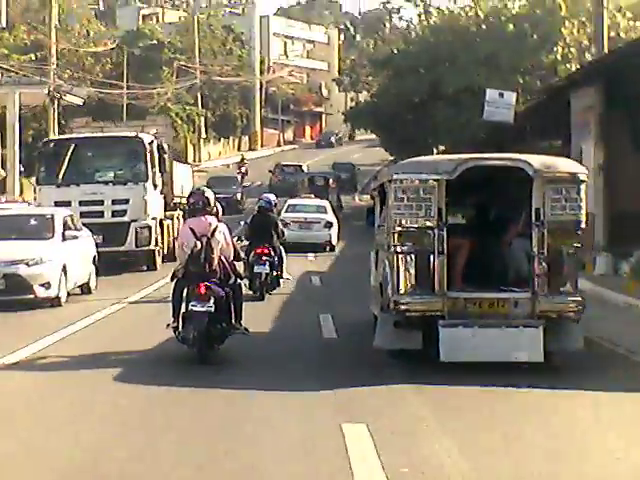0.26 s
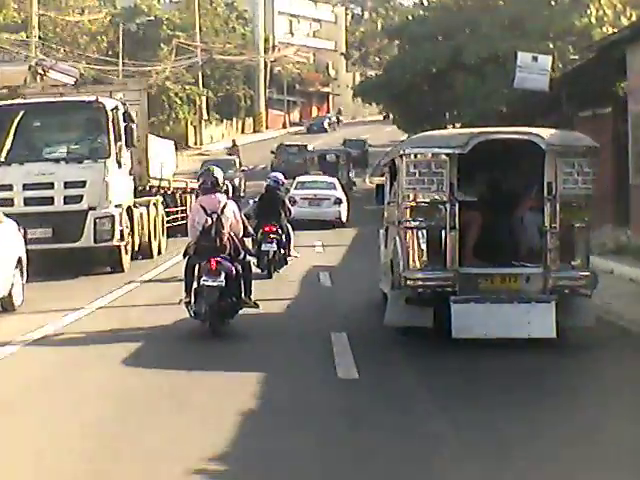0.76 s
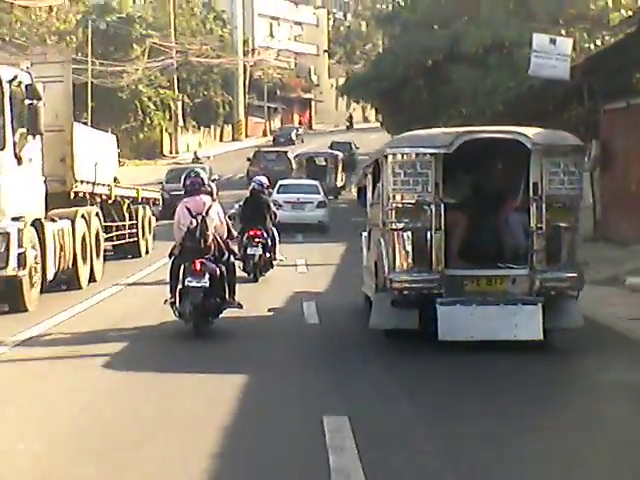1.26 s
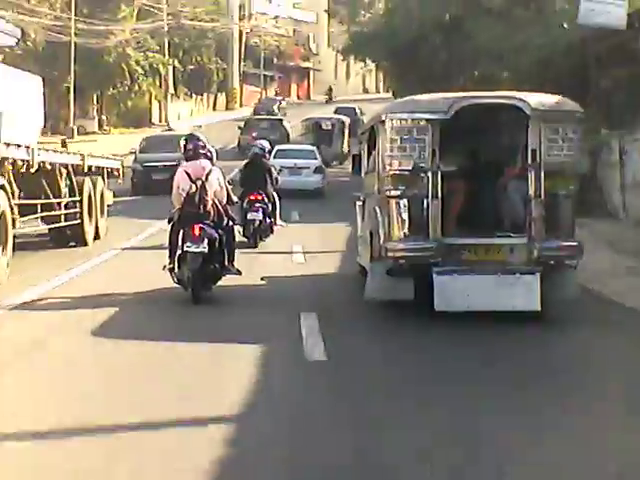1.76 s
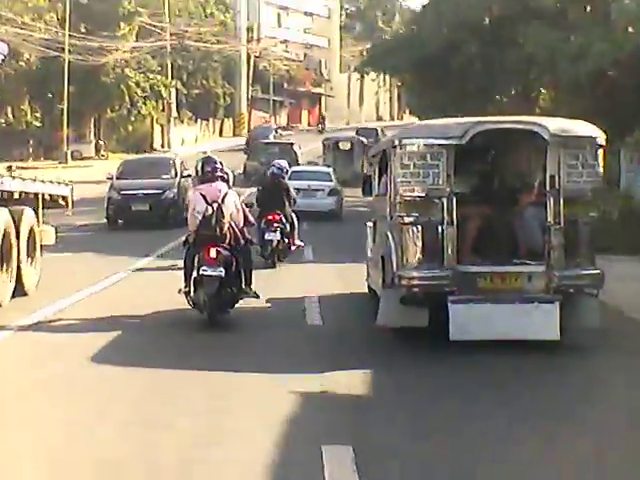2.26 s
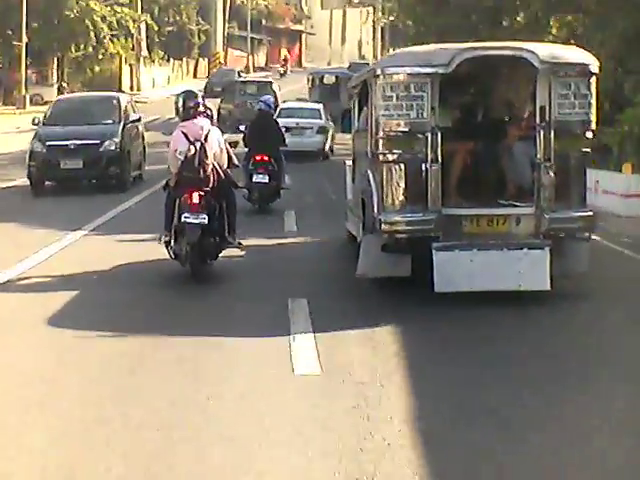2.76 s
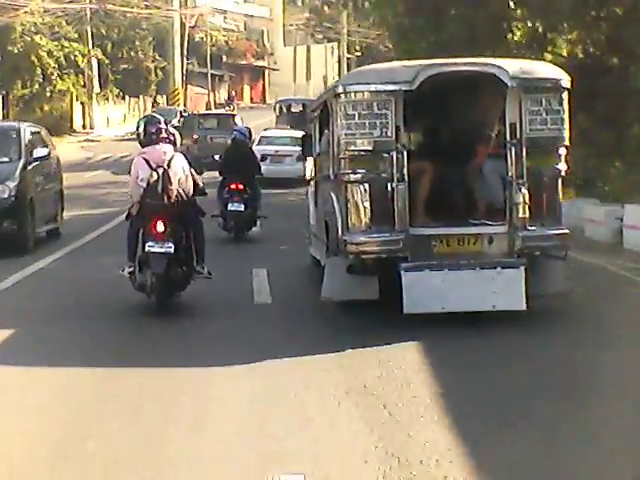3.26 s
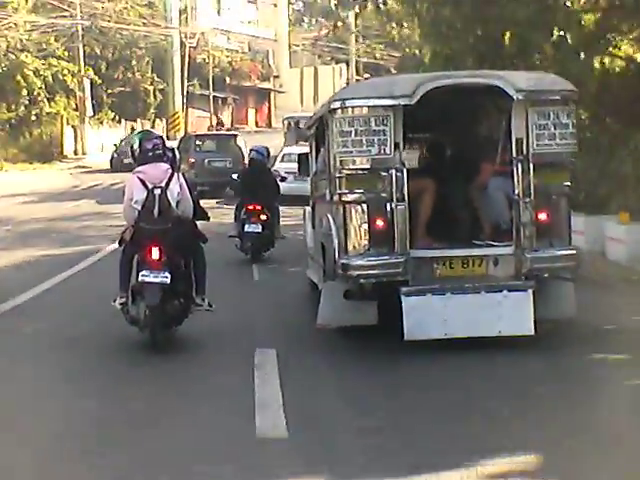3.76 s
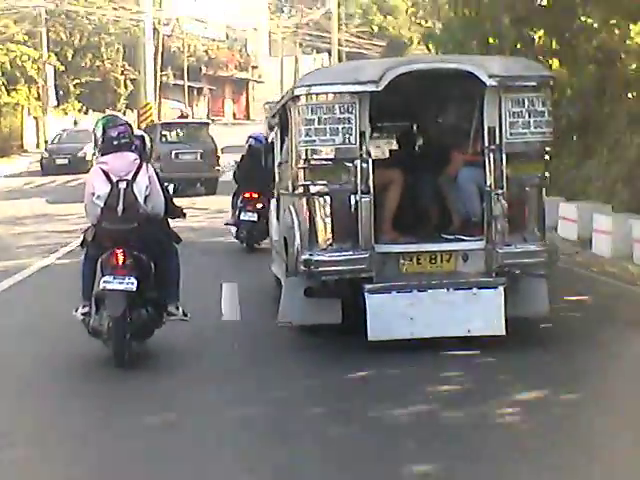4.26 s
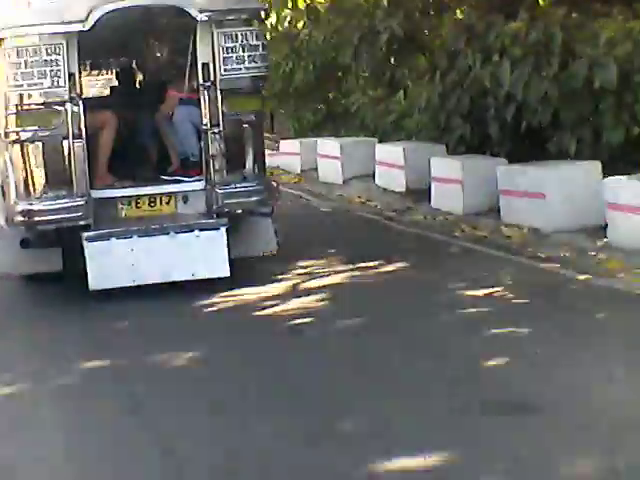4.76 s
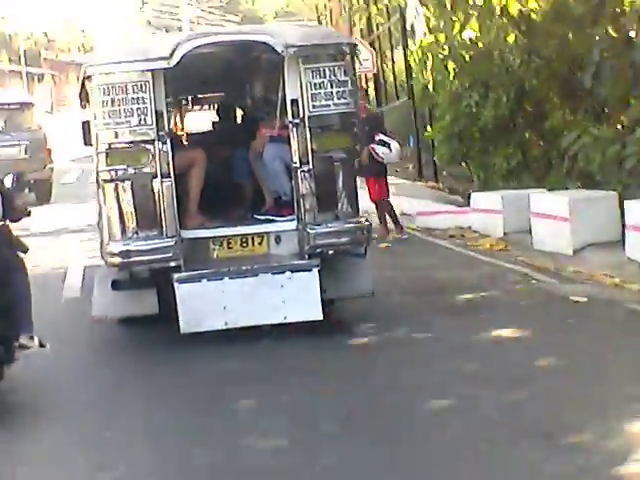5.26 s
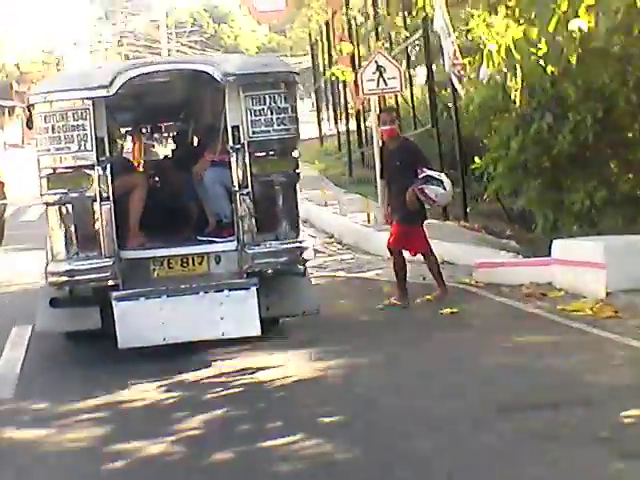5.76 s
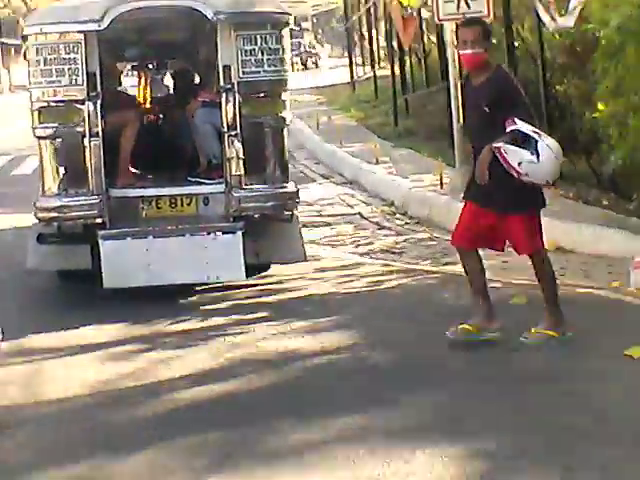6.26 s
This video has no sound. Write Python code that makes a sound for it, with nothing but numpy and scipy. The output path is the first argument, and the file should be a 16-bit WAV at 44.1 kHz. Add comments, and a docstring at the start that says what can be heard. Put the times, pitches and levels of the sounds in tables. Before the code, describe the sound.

Wind and road noise surround a microphone on a small motorcycle moving along a town road. A truck goes by the other way, falling in pitch, while a diesel engine ahead swells and sinks to a dull throb. The bike's engine speeds up slightly, then eases off amid bumps and faint brake squeaks. The wind drops, and the engine chugs slowly as the level jumps and the bodywork knocks twice.

```python
"""Town traffic, heard from a small single-cylinder motorcycle. Firing pulses boom in the silencer and
ring the pipe; the engine speeds up, eases off, then chugs with heavy beats. Wind and tyre roar fall as
the bike slows, until the level jumps up. A truck comes the other way; a diesel minibus ahead pulls and
lifts off. Gusts buffet the microphone, bumps shake the bodywork and brakes squeak faintly."""
import sys
import numpy as np
from scipy import signal
from scipy.fft import rfft, irfft
from scipy.io import wavfile
from scipy.ndimage import uniform_filter1d

SR = 44100
rng = np.random.default_rng(int(sys.argv[2]) if len(sys.argv) > 2 else 0)


def store_wav(level_fs):
    """Save 16-bit WAV to argv[1]."""
    pcm = np.round(np.clip(np.atleast_2d(level_fs), -1, 1) * 32767)
    wavfile.write(sys.argv[1], SR, pcm.T.astype(np.int16))


N = 287091
TIME = np.arange(N) / SR
JUMP_S, ENGINE_JUMP_DB = 5.453, 2.5  # sudden step up in level

# firings that burn harder at low revs: t/s, boost/dB
HARD_BEATS = [(5.262, 7), (5.485, 8.5), (5.599, 7), (5.637, 5), (5.713, 6.5), (6.182, 4), (6.343, 3),
              (6.383, 4), (6.424, 4)]


def undb(db):
    """Decibels to gain."""
    return 10 ** (np.asarray(db) / 20)


def unit(x):
    """Scale to rms 1."""
    return x / np.sqrt(np.mean(x ** 2))


def curve(table):
    """Interpolate (t/s, value) rows per sample."""
    return np.interp(TIME, *np.transpose(table))


def resonate(x, hz, width_hz):
    """Two-pole resonance applied twice; gain 1 at the centre."""
    b, a = signal.iirpeak(hz, hz / width_hz, fs=SR)
    return signal.lfilter(b, a, signal.lfilter(b, a, x))


def colour(x, spectrum):
    """Filter by (f/Hz, level/dB) rows; -12 dB/octave above the last."""
    hz, db = np.transpose(spectrum)
    bins_hz = np.maximum(np.arange(N // 2 + 1) * SR / N, 1)
    gain = undb(np.interp(np.log(bins_hz), np.log(hz), db))
    rolloff = np.minimum(hz[-1] / bins_hz, 1) ** 2
    return irfft(rfft(x) * gain * rolloff, N)


def noise(spectrum):
    """Coloured noise, rms 1."""
    return unit(colour(rng.standard_normal(N), spectrum))


def ring_noise(hz, width_hz):
    """Noise-driven resonance, rms 1."""
    return unit(resonate(rng.standard_normal(N), hz, width_hz))


def walk(rate_hz):
    """Random steps smoothed twice, rms 1."""
    hold = int(SR / rate_hz)
    held = np.repeat(rng.standard_normal(N // hold + 1), hold)
    return unit(uniform_filter1d(uniform_filter1d(held, hold), hold)[:N])


def swell(t_s, sigma_s):
    """Gaussian envelope, peak 1."""
    return np.exp(-.5 * ((TIME - t_s) / sigma_s) ** 2)


def jump():
    """0 before the level jumps, 1 after."""
    return 1. * (TIME >= JUMP_S)


def dip_db(depth_db=4.0, lead_s=0.032, sigma_s=0.025):
    """Brief level dip just before the jump."""
    return -depth_db * swell(JUMP_S - lead_s, sigma_s) * (1 - jump())


def drone(hz, db, orders, waver=0.0035, flutter_db=-1.0):
    """Another vehicle's engine: low orders fluttering in the moving air."""
    turns = np.cumsum(hz * (1 + waver * walk(14))) / SR
    tone = np.zeros(N)
    for order, order_db in orders:
        gain = undb(order_db + flutter_db * walk(14))
        tone += gain * np.sin(2 * np.pi * (order * turns + rng.random()))
    return unit(tone) * undb(db)


def exhaust(cycles, db, spread_db=1.6, pipe_db=-7.5):
    """One pressure pulse per firing rings the pipe and booms in the silencer; no two burn alike."""
    # pipe resonances: f/Hz, width/Hz, level/dB
    pipe_modes = [(398.6, 63, -0.5), (491.3, 65, 1), (575.4, 42, -0.5)]
    # silencer response: f/Hz, level/dB
    silencer = [(25, -28), (55, -14), (82, -6), (105, -1.5), (130, .5), (152, -.3), (171, 2), (205, -11),
                (270, -17), (450, -35)]
    firings = np.flatnonzero(np.diff(np.floor(cycles)))
    burn_db = spread_db * rng.standard_normal(len(firings))
    pulses = np.bincount(firings, -undb(burn_db), N)
    pipe = sum(undb(mode_db) * resonate(pulses, hz, width_hz) for hz, width_hz, mode_db in pipe_modes)
    for t_s, boost_db in HARD_BEATS:  # more gas swells only the boom
        burn_db[np.argmin(abs(firings / SR - t_s))] = boost_db
    boom = colour(np.bincount(firings, -undb(burn_db), N), silencer)
    flutter_db = 1.2 * walk(12)  # turbulent air on the way to the microphone
    return (unit(boom) + undb(pipe_db) * unit(pipe)) * undb(db + flutter_db)


def clatter(cycles, db, decay_turns=0.19, relative_db=-13):
    """Valves and piston rattle the cylinder head each crank turn, twice per firing."""
    gate = np.exp(-(2 * cycles % 1) / decay_turns)
    head = resonate(gate * rng.standard_normal(N), hz=1370, width_hz=740)
    return unit(head) * undb(db + relative_db)


def engine(wobble_cycles=.021):
    """The bike's single cylinder: a slightly uneven crank times exhaust and clatter."""
    # firing rate: t/s, f/Hz
    firing_rate = [(0, 31.0), (.5, 32.0), (1.9, 35.3), (2.3, 36.5), (2.8, 35.5), (3.6, 34.0), (4.3, 31.6),
                   (5.0, 28.0), (5.42, 26.7), (5.85, 25.9), (6.2, 24.8), (6.51, 24.6)]
    # engine effort: t/s, level/dB
    effort = [(0, -40), (1.2, -37.5), (1.9, -38), (2.3, -41.5), (3.7, -35.5), (4.6, -37.5), (5.2, -41),
              (5.6, -39.5), (6.0, -39.5), (6.4, -35)]
    db = curve(effort) + ENGINE_JUMP_DB * jump() + dip_db()
    cycles = np.cumsum(curve(firing_rate)) / SR + wobble_cycles * walk(14)
    cycles -= np.interp(HARD_BEATS[0][0], TIME, cycles)  # a firing lands on the first hard beat
    return exhaust(cycles, db) + clatter(cycles, db)


def whine():
    """Faint, narrow mechanical whines come and go."""
    # whine bands: f/Hz, width/Hz, level/dB
    bands = [(3352, 150, -68), (3867, 280, -68.5)]
    return sum(ring_noise(hz, width_hz) * undb(db + 1.7 * walk(3)) for hz, width_hz, db in bands)


def rush(brake_s=2.45, roll_on_s=4.95, slow_ratio=0.53):
    """Eddies buffet the microphone and shake the bodywork; tyres and air hiss run on more evenly."""
    # spectra of wind buffet, body rumble, tyre roar and air hiss: f/Hz, level/dB
    wind_spectrum = [(30, -22.5), (60, -14.5), (90, -10.5), (130, 0.5), (190, 0.5), (250, -3.5), (330, -8),
                     (450, -22), (800, -61)]
    rumble_spectrum = [(150, -29.5), (250, -4.5), (330, -1.5), (400, -1.5), (500, -3.5), (640, -7),
                       (850, -16.5), (1500, -42.5)]
    tyre_spectrum = [(400, -22), (620, -3.5), (800, 1), (1000, -0.5), (1180, -4), (1400, -2), (1650, -6),
                     (1850, -8.5), (2150, -17), (2800, -27.5), (4000, -42.5)]
    hiss_spectrum = [(1500, -20.5), (2200, 3.5), (3000, 4), (3500, -2), (3850, 0.5), (4400, -2),
                     (5300, -8.5), (6200, -6.5), (6900, -9), (7500, -27.5)]
    air_spectrum = [(15, -31), (30, -14.5), (48, -6.0), (75, 0.5), (110, -2.0), (200, -18.5)]
    # gusts and lulls: t/s, sigma/s, rise/dB
    gusts = [(0.402, 0.1, 4), (0.726, 0.088, 4), (0.977, 0.088, 3.5), (1.19, 0.032, 0), (1.42, 0.05, 0),
             (1.593, 0.11, 4.5), (1.825, 0.022, -4.5), (1.98, 0.04, -1), (2.28, 0.023, 4),
             (2.395, 0.046, 1.5), (2.654, 0.026, 3.5), (3.063, .07, -2.5), (3.385, 0.1, 3),
             (3.6, 0.061, -2.5), (3.9, 0.16, 2), (4.29, 0.044, -3), (4.552, 0.09, 3.5),
             (4.757, 0.026, -2.5), (5.6, 0.056, 1)]
    # layer levels: cruise/dB, rise per speed doubling/dB, gust share, jump/dB
    air_law = (-44, 0, 0.8, 2.5)
    wind_law = (-34.5, 5.5, 1.03, 3)
    rumble_law = (-35.5, 6, 1, 3.5)
    tyre_law = (-38, 4, 0.2, 5.5)
    hiss_law = (-52.5, 3.5, 0.07, 5.5)
    speed_ratio = np.interp(TIME, [brake_s, roll_on_s], [1, slow_ratio])
    gust_db = sum(db * swell(t_s, sigma_s) for t_s, sigma_s, db in gusts)
    air_db, wind_db, rumble_db, tyre_db, hiss_db = (
        cruise_db + speed_db * np.log2(speed_ratio) + share * gust_db + jump_db * jump() + dip_db()
        for cruise_db, speed_db, share, jump_db in (air_law, wind_law, rumble_law, tyre_law, hiss_law))
    eddies = walk(27.95)
    air = noise(air_spectrum) * undb(air_db)
    wind = noise(wind_spectrum) * undb(wind_db + 1.3 * eddies)
    rumble = noise(rumble_spectrum) * undb(rumble_db + 0.99 * eddies)
    tyres = noise(tyre_spectrum) * undb(tyre_db + 0.78 * eddies + 0.21 * walk(45))
    hiss = noise(hiss_spectrum) * undb(hiss_db + 0.19 * eddies + 0.45 * walk(60))
    return air + wind + rumble + tyres + hiss


def minibus(lift_s=2.34, crossfade_s=0.11):
    """A diesel climbs in pitch and level under load, then sinks to a dull throb off the throttle."""
    # engine orders under load and coasting: order, level/dB
    pull_orders = [(1, -2), (2, 0.5), (3, -15.5), (4, 4.5), (6, -18.5)]
    coast_orders = [(1, -1.5), (2, 5.5), (3, -9), (4, -13), (6, -11)]
    low_hz, top_hz, rise_hz_per_s, sag_hz_per_s = 82, 85.3, 2.6, 3
    cruise_db, top_db, build_db_per_s = -43, -34.5, 8
    lift_db, low_db, fade_db_per_s = -39, -49.5, 4
    before_s, after_s = np.maximum(lift_s - TIME, 0), np.maximum(TIME - lift_s, 0)
    hz = np.maximum(top_hz - rise_hz_per_s * before_s - sag_hz_per_s * after_s, low_hz)
    pull_db = np.maximum(top_db - build_db_per_s * before_s, cruise_db)
    coast_db = np.maximum(lift_db - fade_db_per_s * after_s, low_db) + ENGINE_JUMP_DB * jump()
    pull = drone(hz, pull_db, pull_orders, waver=0.0021, flutter_db=-0.5)
    coast = drone(hz, coast_db, coast_orders, flutter_db=3)
    lifted = np.minimum(after_s / crossfade_s, 1)
    return (1 - lifted) * pull + lifted * coast


def truck(crank_hz=37.6, doppler=.067, abreast_s=1.0, glide_s=.8):
    """An oncoming engine falls in pitch by Doppler shift, with rattle and tyre sizzle."""
    # engine orders: order, level/dB
    orders = [(1.5, -16.5), (3, -2.5), (4.5, -6.5), (5, 0), (6, -7.5), (9.5, -6)]
    # tyre sizzle: f/Hz, level/dB
    sizzle_spectrum = [(1900, -2.5), (2600, 4.5), (3400, -1.5), (4200, 2.5), (5200, -1), (7000, -5)]
    hz = crank_hz * (1 - doppler * np.tanh((TIME - abreast_s) / glide_s))
    motor = drone(hz, db=-34, orders=orders) * swell(0.25, 0.74)
    rattle = ring_noise(1300, 400) * swell(0.46, 0.27) * undb(-43.0)
    sizzle = noise(sizzle_spectrum) * (swell(0.3, 0.22) * undb(-54.0) + swell(0.76, 0.18) * undb(-53.5))
    return motor + rattle + sizzle


def puffs():
    """Pockets of air thud on the microphone."""
    # air pockets: t/s, sigma/s, level/dB
    pockets = [(0.283, .02, -40), (1.423, 0.018, -32), (2.343, 0.04, -34), (3.24, 0.025, -36),
               (4.13, .03, -34), (5.574, 0.019, -33), (6.40, .022, -34)]
    envelope = sum(undb(db) * swell(t_s, sigma_s) for t_s, sigma_s, db in pockets)
    return ring_noise(hz=75, width_hz=79) * envelope


def bumps(relative_width=0.89):
    """Each road bump briefly shakes a bodywork resonance."""
    # shudders: t/s, sigma/s, level/dB, f/Hz
    shudders = [(0.355, 0.012, -28, 390), (0.637, 0.019, -23, 340), (0.668, 0.011, -29, 604),
                (0.76, 0.015, -25, 279), (0.79, 0.012, -36, 690), (0.978, 0.017, -24.5, 175),
                (1.357, 0.011, -23, 170), (1.489, 0.011, -24.5, 200), (1.602, 0.02, -31.5, 500),
                (1.622, 0.0092, -25, 175), (1.795, 0.02, -41, 1420), (1.86, 0.018, -28.5, 320),
                (2.294, 0.03, -32.5, 200), (2.377, 0.0075, -22, 290), (2.398, 0.0087, -24, 250),
                (2.411, 0.018, -27, 563), (3.278, 0.013, -27.5, 175), (3.454, 0.015, -32.5, 400),
                (3.5, 0.013, -36, 600), (3.823, 0.0078, -23, 205), (3.874, 0.045, -32, 360),
                (5.487, 0.025, -33.5, 350), (5.665, 0.015, -30.5, 310), (6.04, 0.02, -34.5, 400)]
    return sum(ring_noise(hz, relative_width * hz) * swell(t_s, sigma_s) * undb(db)
               for t_s, sigma_s, db, hz in shudders)


def clinks(attack_s=.0015):
    """Jolted loose metal: quick start, short bright tail."""
    # jolts: t/s, level/dB, decay/s
    jolts = [(.678, -49.5, 0.027), (1.785, -59, 0.018), (3.643, -57, .012), (6.184, -49.5, .012),
             (6.203, -54, .04), (6.458, -52, .01)]
    # ring of the metal: f/Hz, level/dB
    metal_spectrum = [(1500, -10), (2800, -4.5), (4200, 9), (5600, -1), (7000, 0)]
    envelope = np.zeros(N)
    for t_s, db, decay_s in jolts:
        attack = np.clip((TIME - t_s) / attack_s + 1, 0, 1)
        envelope += undb(db) * attack * np.exp(-np.maximum(TIME - t_s, 0) / decay_s)
    return noise(metal_spectrum) * envelope


def brakes():
    """Pads rub a disc into short, unsteady rings, some clear, some scraping."""
    # squeaks: t/s, sigma/s, f/Hz, width/Hz, level/dB
    squeaks = [(2.355, .025, 6000, 300, -62), (2.49, .035, 5960, 300, -63), (2.5, .25, 5700, 1900, -60.5),
               (2.33, .13, 3070, 220, -62), (3.625, .06, 1330, 70, -43.5), (3.62, .022, 2800, 220, -56),
               (3.65, .008, 4500, 280, -57), (3.66, .02, 6300, 700, -64), (6.188, .009, 6820, 280, -55),
               (6.22, .03, 4200, 280, -57.5), (6.26, .05, 5050, 220, -65), (6.457, .018, 4130, 250, -54.5),
               (6.472, .022, 5060, 180, -56.5)]
    return sum(ring_noise(hz, width_hz) * swell(t_s, sigma_s) * undb(db)
               for t_s, sigma_s, hz, width_hz, db in squeaks)


def hums(waver=0.013):
    """Low, wavering hums swell and fade in the traffic."""
    # hums: t/s, sigma/s, f/Hz, level/dB
    tones = [(2.751, 0.38, 45.2, -45.5), (3.45, 0.45, 86.5, -49.5), (4.251, 0.34, 81.9, -48),
             (6.251, 0.71, 186.3, -51.5)]
    out = np.zeros(N)
    for t_s, sigma_s, hz, db in tones:
        cycles = np.cumsum(hz * (1 + waver * walk(12))) / SR
        out += unit(np.sin(2 * np.pi * cycles)) * swell(t_s, sigma_s) * undb(db)
    return out


def knocks():
    """Each hard knock rings a body panel's damped modes."""
    # strikes: t/s, peak level/dB
    strikes = [(5.453, -24), (6.041, -16.5)]
    # panel modes: f/Hz, level/dB, decay/s
    modes = [(330, -5, .02), (510, 0, .018), (660, -2, .012), (860, -5, .007)]
    out = np.zeros(N)
    for t_s, db in strikes:
        age_s = np.maximum(TIME - t_s, 0)
        ring = sum(undb(mode_db) * np.sin(2 * np.pi * hz * age_s) * np.exp(-age_s / decay_s)
                   for hz, mode_db, decay_s in modes)
        out += undb(db) * ring / abs(ring).max()
    return out


def scene():
    """Bike, air and traffic at one microphone."""
    bike = engine() + whine() + bumps() + knocks() + clinks()
    return (bike + rush() + minibus() + truck() + puffs() + hums() + brakes())[None]


def record(dry):
    """Small microphone: shallow treble notch, steep low-pass."""
    notch_depth, cutoff_hz = 0.24, 7170
    notched = dry - notch_depth * resonate(dry, hz=3416, width_hz=240)
    return signal.sosfilt(signal.ellip(10, .2, 75, cutoff_hz, fs=SR, output="sos"), notched)


dry = scene()
out = record(dry)
store_wav(out)
```